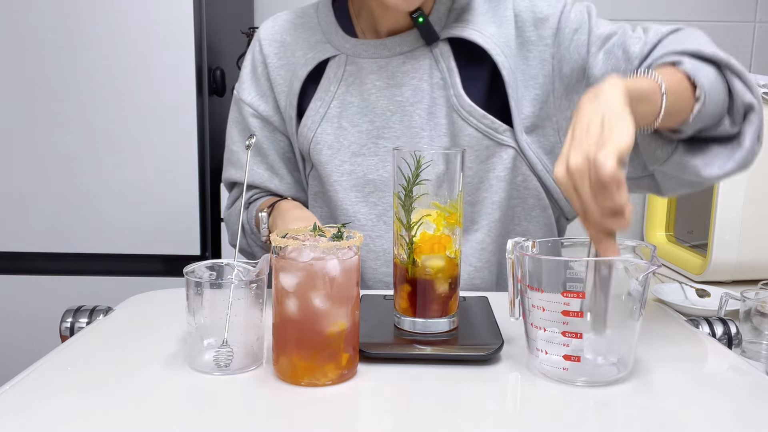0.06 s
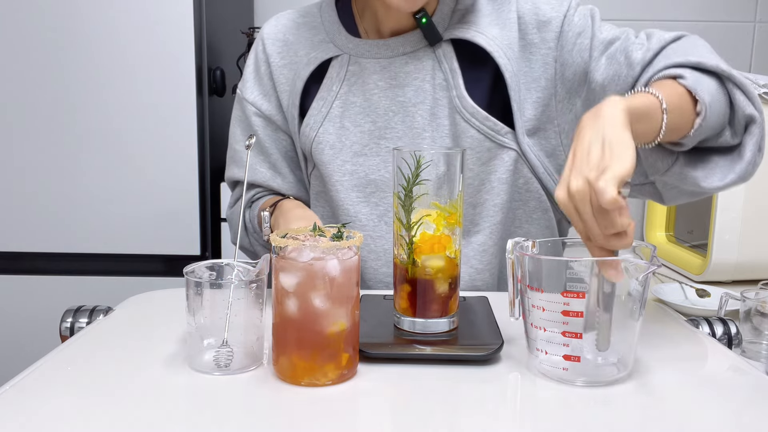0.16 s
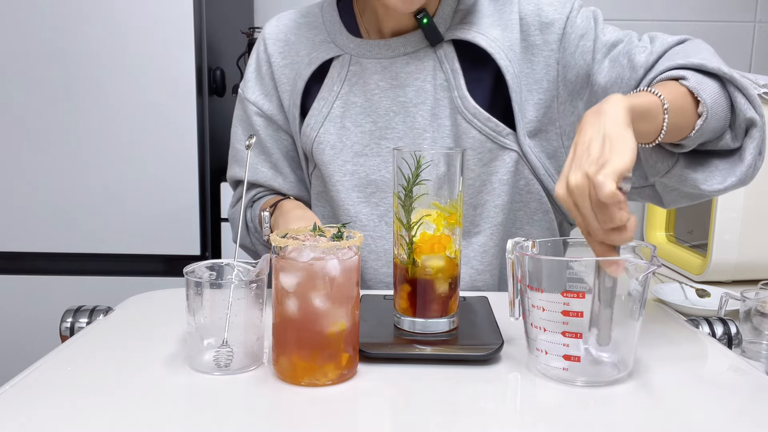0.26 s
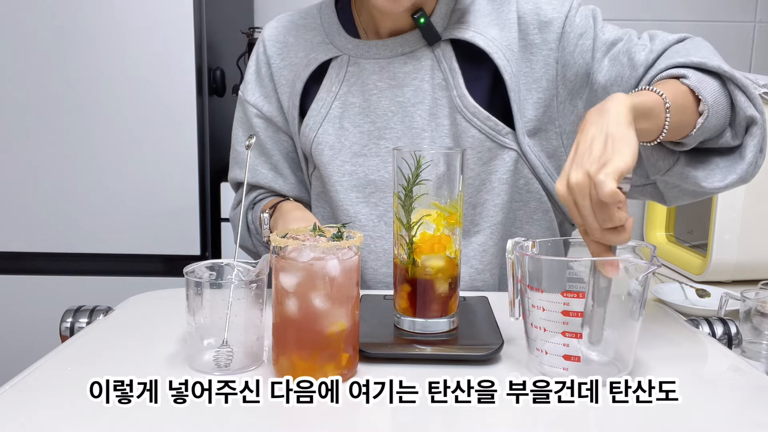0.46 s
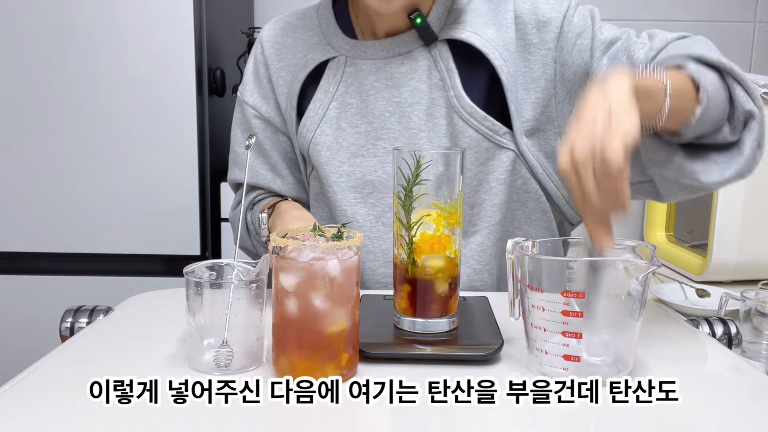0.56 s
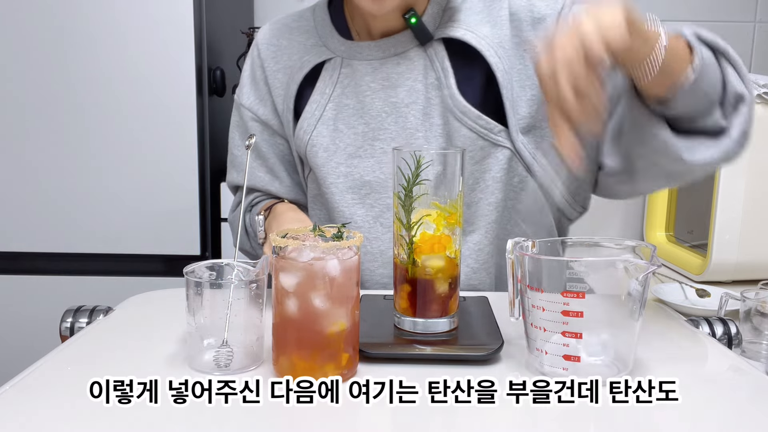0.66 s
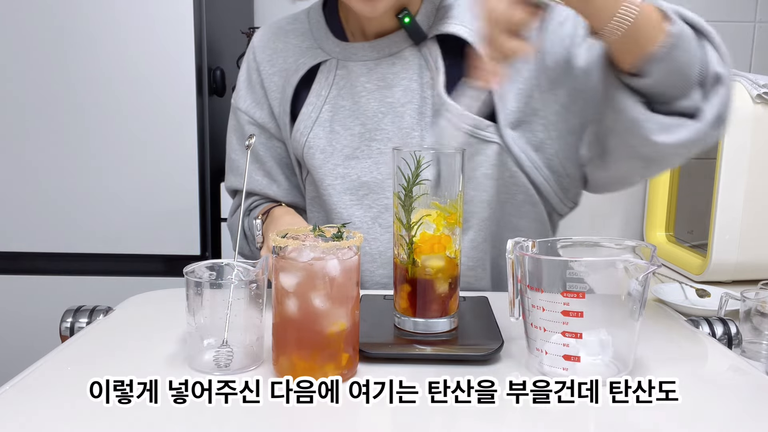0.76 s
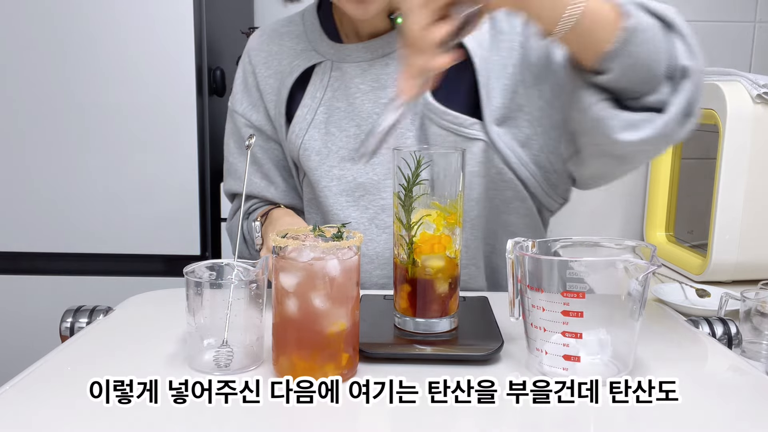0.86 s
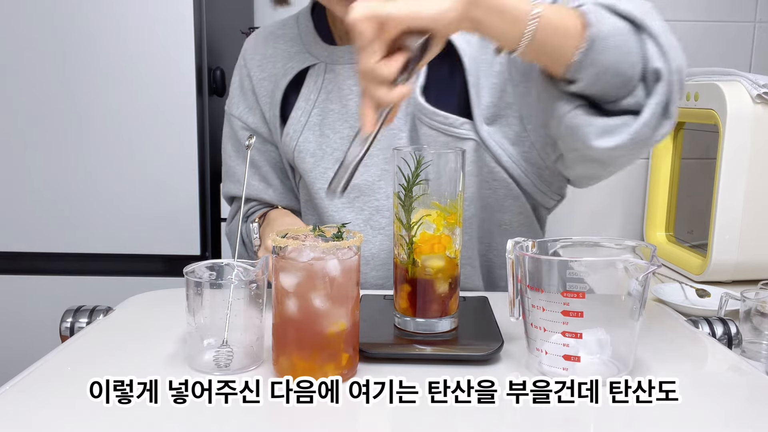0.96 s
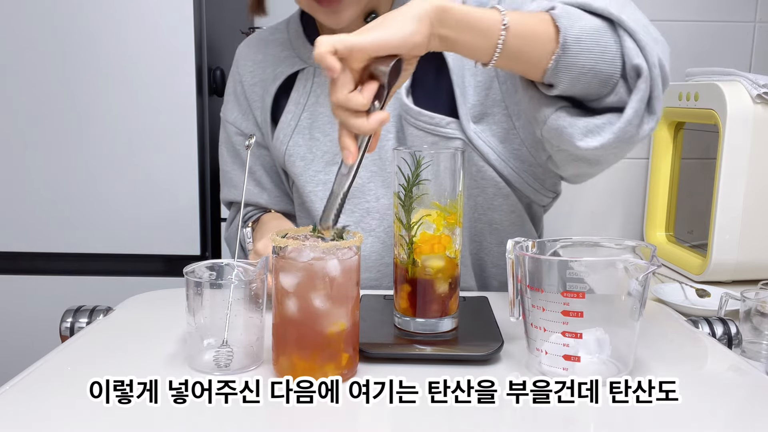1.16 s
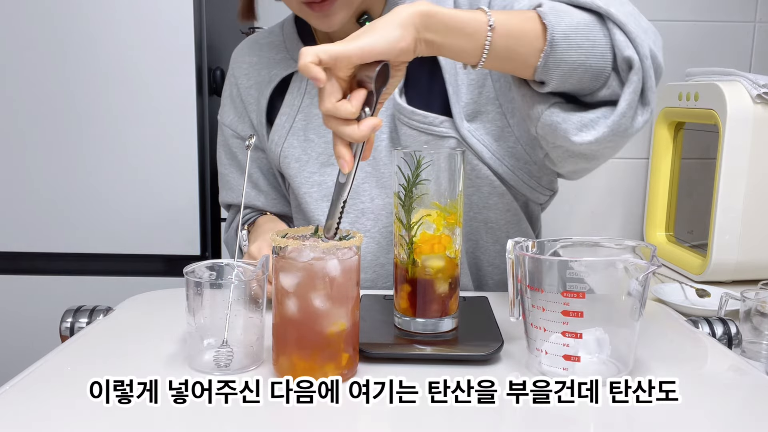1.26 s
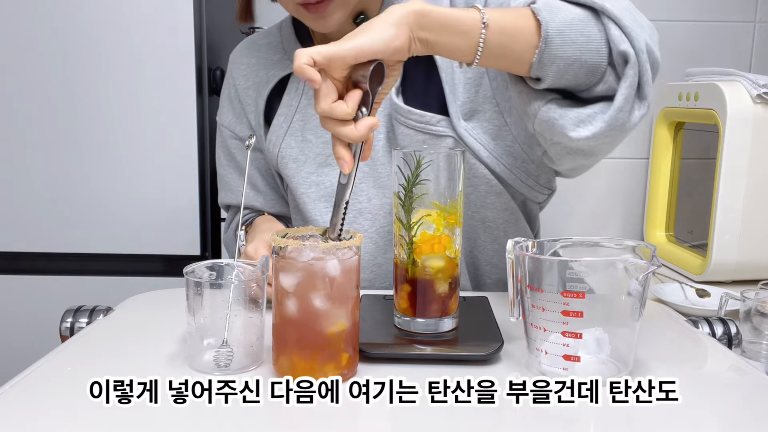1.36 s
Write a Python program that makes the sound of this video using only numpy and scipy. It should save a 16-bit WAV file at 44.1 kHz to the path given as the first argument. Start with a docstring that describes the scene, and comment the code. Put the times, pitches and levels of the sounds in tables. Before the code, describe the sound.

Ice clatters in a jug, a light rattle and then a louder clinking tumble.

```python
"""Ice cubes in a jug

Tongs pick at ice in a jug, close by in a small kitchen: a light rattle, then a loud tumble.
Each hit is a dull knock, a bright crack, the hum of the jug, the ring of its wall and a glassy clink.
The cubes slide with tiny clicks, and the table thuds under the jug.
A soft tap and a faint rustle follow over quiet room air."""
import sys
import numpy as np
from scipy import signal
from scipy.fft import rfft, irfft, next_fast_len
from scipy.io import wavfile

SR = 44100
rng = np.random.default_rng(int(sys.argv[2]) if len(sys.argv) > 2 else 0)


def to_wav(sig):
    """Store sig (one row per channel, or 1-D mono) as 16-bit WAV at the path in sys.argv[1].

    Samples outside -1..1 are clipped; the rate is SR.
    """
    pcm = np.clip(np.atleast_2d(sig), -1, 1) * 32767
    pcm = np.round(pcm).astype(np.int16)
    wavfile.write(sys.argv[1], SR, pcm.T)  # frames by channels


N = 61739
BURST_SAMPLES, RING_SAMPLES = 4096, 24576
ATTACK_S = 0.00093

# The bright tone colour of cracking ice. Each row: frequency in Hz, relative level in dB.
ICE_COLOUR = [(500, -26), (3000, -7.5), (5000, -3), (6600, -14.5), (8800, -8), (10000, -1), (11500, -3.5),
              (14300, 2.5), (16000, -7.5)]


def undb(db):
    """Turns decibels into a number to multiply by."""
    return 10 ** (np.asarray(db) / 20)


def on_log(hz, points):
    """Reads between (Hz, value) points, giving every octave the same width."""
    p = np.array(points, float)
    return np.interp(np.log(np.maximum(hz, 1)), np.log(p[:, 0]), p[:, 1])


def noise(colour, size):
    """Noise with the given tone colour and a typical size (rms) of 1."""
    gains = undb(on_log(np.fft.rfftfreq(size, 1 / SR), colour))
    x = irfft(rfft(rng.standard_normal(size)) * gains, size)
    return x / x.std()


def fade(fade_s, size=RING_SAMPLES):
    """Dies away, falling 60 dB in the fade time."""
    return np.exp(-np.log(1000) * np.arange(size) / SR / fade_s)


def rise(seconds, size=RING_SAMPLES):
    """Climbs evenly from 0 to 1, then stays there."""
    return np.minimum(np.arange(size) / SR / seconds, 1)


def burst(colour, fade_s, attack_s):
    """The noisy, quickly dying shake of a hit; chance does not change its energy."""
    shape = rise(attack_s, BURST_SAMPLES) * fade(fade_s, BURST_SAMPLES)
    x = noise(colour, BURST_SAMPLES) * shape
    return x * np.sqrt(np.sum(shape ** 2) / np.sum(x ** 2))


def ring(tones, pitch=1, size=RING_SAMPLES):
    """A struck object rings with its own tones, each a fading sine wave."""
    t = np.arange(size) / SR
    waves = (undb(db) * fade(fade_s, size) * np.sin(2 * np.pi * hz * pitch * t)
             for hz, db, fade_s in tones)
    return rise(ATTACK_S, size) * sum(waves)


def strike(waves, scatter_db=1.5):
    """Mixes an object's tones at random strengths, as each spot that is hit favours different ones."""
    return undb(scatter_db * rng.standard_normal(len(waves))) @ waves


def add(out, start, x):
    """Mixes x into out from a start time in seconds."""
    i = max(int(start * SR), 0)
    x = x[:len(out) - i]
    out[i:i + len(x)] += x


def room_air():
    """The quiet, steady noise of the room."""
    # A mostly low hush. Each row: frequency in Hz, relative level in dB.
    air_colour = [(15, -30), (25, 0.5), (195, -1.5), (962, -10), (1500, -14), (2160, -17.5), (4140, -20.5),
                  (14800, -24.5), (16000, -29)]
    return undb(-69) * noise(air_colour, next_fast_len(N))[:N]


def ice_hits():
    """Each cube knocks and cracks, with a very short bright rise into the crack; cube and jug ring."""
    # The hits. Each row: start in seconds, relative levels in dB of the knock, crack, jug body,
    # jug wall and clink, then the cube's pitch in Hz.
    hits = [ (0.051, -66, -33.5, -43, -65, -74, 12000), (0.1214, -29, -20.5, -15, -32, -48.5, 10600),
            (.1272, -23, -14, -14, -26, -45.5, 12600), (.1298, -11.5, -13.5, -7.5, -17.5, -40, 13050),
            (0.1363, -19, -15.5, -13, -28, -43, 13240), (.1650, -19, -26.5, -15, -29.5, -36, 10600),
            (0.1762, -9.5, -12.5, -3.5, -18, -27.5, 11000), (.1935, -17, -29.5, -9.5, -21.5, -33, 11600),
            (.2076, -9, -22, -15, -17.5, -16, 10100), (.2258, -3, -20, -12.5, -18, -14.5, 10500),
            (.2512, -16.5, -27.5, -10.5, -21, -28.5, 10400), (.2605, -8.5, -24.5, -8.5, -20, -35.5, 10800),
            (.2925, -33.5, -32, -21, -33, -49, 13400), (0.3085, -19.5, -32, -31, -26, -38.5, 10800),
            (.3185, -17, -29.5, -25, -27, -28.5, 10500), (0.4478, 3, 2.5, -9.5, -8.5, 5, 14500),
            (.457, 2, 9, -4, 0.5, 3.5, 13450), (.4605, -6, -3.5, -15.5, -18, -6, 12550),
            (0.4735, 1, 3.5, 0.5, -19.5, -10.5, 15000), (.5252, -4, -5.5, -12.5, -14, -34, 13800),
            (.5337, -1.5, 2, -5, -9, -0.5, 13100), (0.5684, -2.5, -5, -3, -9.5, -24.5, 12700),
            (.5805, -7.5, -23, -12, -26, -20, 12900), (0.6133, -14.5, -22, -24, -20, -44, 11000),
            (.6225, -18, -26, -23, -24, -49, 13900)]
    # Tones of the jug's body, its wall and the glassy clink.
    # Each row: frequency in Hz, relative level in dB, fade time in seconds.
    body_tones = [(367.6, -12, 0.16), (392, -15, 0.08), (752, -2.5, 0.14), (804.3, -12, 0.08),
                  (1030, -9, .07), (3380, -2, .05), (3612, -3, 0.06)]
    wall_tones = [(1259, -6, .07), (1490, -9, .07), (1573, -6, .07), (1732, -7, .09), (1886, 1, .11)]
    clink_tones = [(2107, -24, .73), (2133, 2.5, .11), (2191, -2, .09), (2307, -1, .07), (3486, -4, .05),
                   (3679, -4, .055), (3796, -2, .055), (4215, -7, .055), (4400, -9, .055), (5540, -15, .05)]
    # A cube's high tones. Each row: multiple of its pitch, relative level in dB, fade time in seconds.
    cube_tones = [(.555, -10, .02), (.75, -11, .015), (.94, -2, 0.013), (1., 3, 0.013)]
    # Colours of the knock and the jug's dull body. Each row: frequency in Hz, relative level in dB.
    knock_colour = [(60, -31), (500, -18.5), (950, -20.5), (1350, 1.5), (1750, 5), (2020, 2.5),
                    (2550, -5.5), (3600, -0.5), (4600, -10), (6500, -25.5), (9000, -38)]
    hollow_colour = [(50, -17.5), (170, -4.5), (250, -8), (370, -19), (480, -6.5), (780, 9.5), (1050, 1.5),
                     (1500, -21), (5000, -44.5)]
    crack_fade_s, onset_lead_s = 0.011, 0.00067
    body = np.array([ring([tone]) for tone in body_tones])
    wall = np.array([ring([tone]) for tone in wall_tones])
    clink = np.array([ring([tone]) for tone in clink_tones])
    out = np.zeros(N)
    for start, knock_db, crack_db, body_db, wall_db, clink_db, cube_hz in hits:
        push_s = ATTACK_S * undb(-0.36 * max(knock_db, -24))  # weaker knocks push longer, up to a limit
        knock = undb(knock_db - 19) * burst(knock_colour, fade_s=0.023, attack_s=push_s)
        cube = undb(crack_db - 26.5) * ring(cube_tones, cube_hz, BURST_SAMPLES)
        crack = undb(crack_db - 22) * burst(ICE_COLOUR, crack_fade_s, ATTACK_S)
        crack_tail = undb(crack_db - 29.5) * burst(ICE_COLOUR, fade_s=0.03, attack_s=ATTACK_S)
        crack_onset = undb(crack_db - 25) * burst(ICE_COLOUR, crack_fade_s, onset_lead_s)
        hollow = undb(body_db - 33) * burst(hollow_colour, fade_s=0.086, attack_s=0.0055)
        add(out, start - onset_lead_s, crack_onset)
        add(out, start, knock + cube + crack + crack_tail + hollow)
        add(out, start, undb(body_db - 34) * strike(body))
        add(out, start, undb(wall_db - 22.5) * strike(wall))
        add(out, start, undb(clink_db - 25.5) * strike(clink))
    return out


def kitchen_echo(sound):
    """Reflections blur into a short echo; each octave fades at its own pace, the treble first."""
    # The echo's colour. Each row: frequency in Hz, relative level in dB.
    echo_colour = [(60, 2.5), (170, 8.5), (300, 0), (500, 6.5), (1500, -7), (4000, -3.5), (8000, 0.5),
                   (15000, -21.5)]
    # How long the room rings. Each row: frequency in Hz, fade time in seconds.
    fade_times = [(100, 0.34), (500, 0.2), (2000, 0.46), (5000, 0.18), (14000, 0.12)]
    delay_s, build_s = 0.004, 0.0078
    hz = np.fft.rfftfreq(RING_SAMPLES, 1 / SR)
    spectrum = rfft(rng.standard_normal(RING_SAMPLES)) * undb(on_log(hz, echo_colour))
    octaves_hz = 62.5 * 2. ** np.arange(9)
    echo = np.zeros(RING_SAMPLES)
    for centre in octaves_hz:
        band = on_log(hz, [(c, c == centre) for c in octaves_hz])
        shape = fade(on_log(centre, fade_times)) * rise(build_s)
        add(echo, delay_s, irfft(spectrum * band) * shape / np.linalg.norm(shape))
    return undb(-5.5) * signal.fftconvolve(sound, echo)[:N]


def ice_slides(slips_per_s=600, scatter_db=5):
    """Sliding ice catches and slips in tiny random clicks."""
    # The slides between hits. Each row: start in seconds, length in seconds, level in dB.
    slides = [(0.126, 0.018, -36.5), (0.158, 0.035, -42), (0.204, 0.04, -47.5), (.449, 0.013, -32),
              (0.474, 0.019, -37.5), (0.517, 0.096, -54.5)]
    out = np.zeros(N)
    t = np.arange(BURST_SAMPLES) / SR
    for start, length, db in slides:
        slips = rng.random(BURST_SAMPLES) < slips_per_s / SR
        sizes = undb(scatter_db * rng.standard_normal(BURST_SAMPLES))
        click = burst(ICE_COLOUR, fade_s=0.004, attack_s=ATTACK_S)
        clicks = signal.fftconvolve(slips * sizes, click)[:BURST_SAMPLES]
        swell = np.sin(np.pi * np.minimum(t / length, 1))
        add(out, start, undb(db) * clicks / clicks.std() * swell)
    return out


def table_thuds():
    """The table under the jug rings with low thuds."""
    # The thuds. Each row: start in seconds, level in dB.
    thuds = [(0.131, -57.5), (0.473, -58.5)]
    # The table's tones. Each row: frequency in Hz, relative level in dB, fade time in seconds.
    table_tones = [(66.3, -2, 0.32), (84, -6.5, 0.057), (160, -10, 1)]
    out = np.zeros(N)
    for start, db in thuds:
        add(out, start, undb(db) * ring(table_tones))
    return out


def soft_tap():
    """A soft, dead tap whose tones die almost at once."""
    # Its tones, the last a tiny ping. Each row: frequency in Hz, relative level in dB, fade in seconds.
    tap_tones = [(606, 2.5, 0.035), (970, 8.5, 0.017), (1129, -4.5, 0.029), (4830, -16, 0.025)]
    return undb(-47) * ring(tap_tones)


def arm_rustle():
    """An arm moves over with a faint, fading rustle."""
    # The rustle's muffled colour. Each row: frequency in Hz, relative level in dB.
    rustle_colour = [(100, -17), (550, -6), (1300, -6), (2500, -26), (8000, -45)]
    return undb(-67) * noise(rustle_colour, RING_SAMPLES) * rise(seconds=0.02) * fade(fade_s=0.4)


def scene():
    """Ice and soft handling sounds echo in the kitchen, over quiet air."""
    clatter = ice_hits() + ice_slides()
    handling = table_thuds()
    add(handling, start=0.8107, x=soft_tap())
    add(handling, start=1.075, x=arm_rustle())
    air = room_air()
    echo = kitchen_echo(clatter + 0.4 * handling)  # only part of the handling reaches the room
    return (clatter + handling + echo + air)[None]


def record(dry, top_hz=15750):
    """A steep filter cuts away the highest treble."""
    return signal.sosfilt(signal.ellip(10, .2, 70, top_hz, fs=SR, output="sos"), dry)


dry = scene()
out = record(dry)
to_wav(out)
```